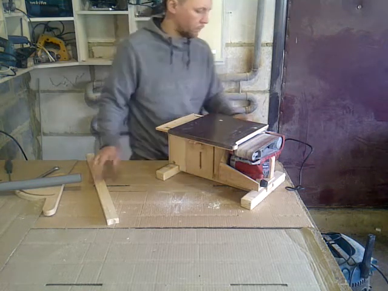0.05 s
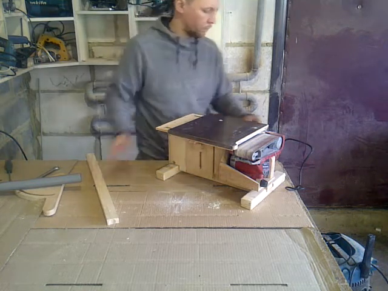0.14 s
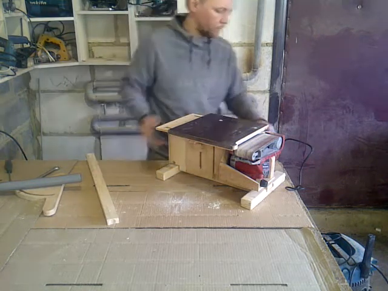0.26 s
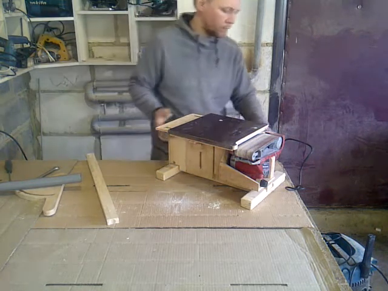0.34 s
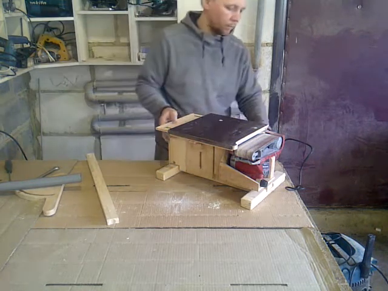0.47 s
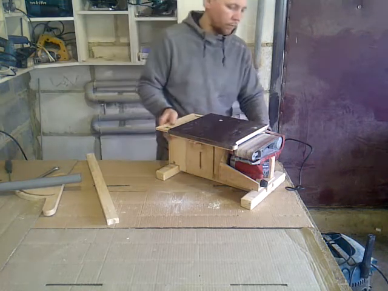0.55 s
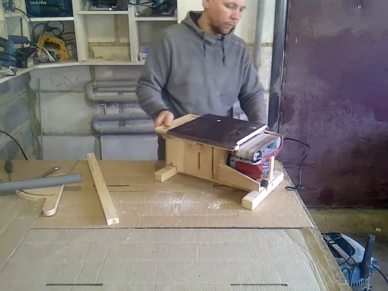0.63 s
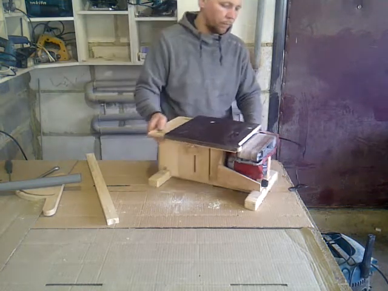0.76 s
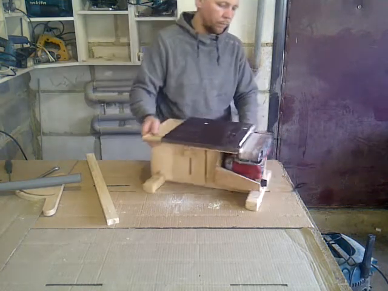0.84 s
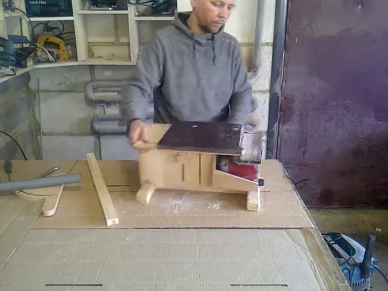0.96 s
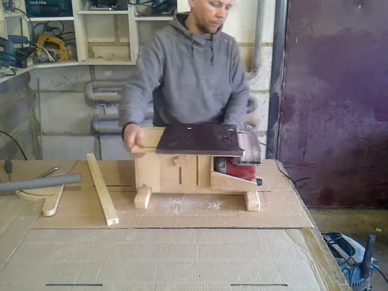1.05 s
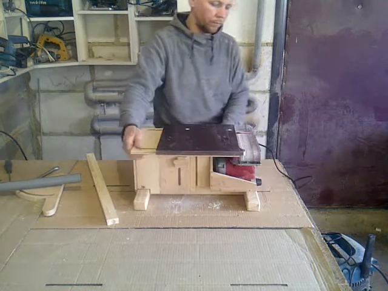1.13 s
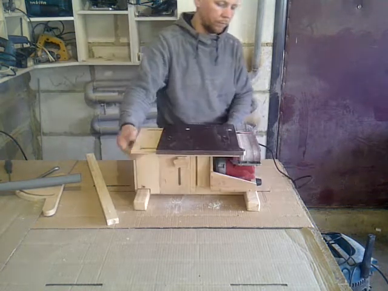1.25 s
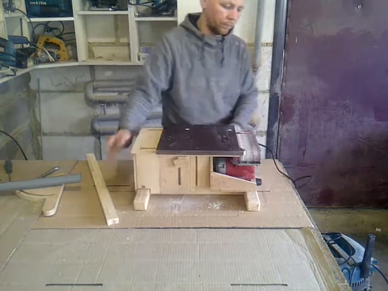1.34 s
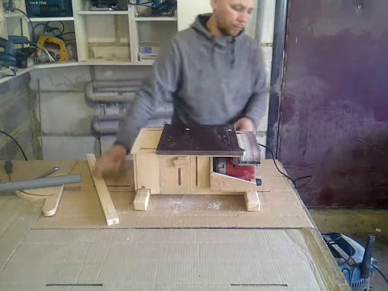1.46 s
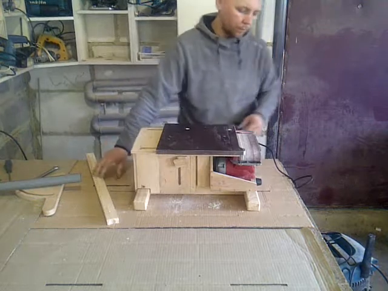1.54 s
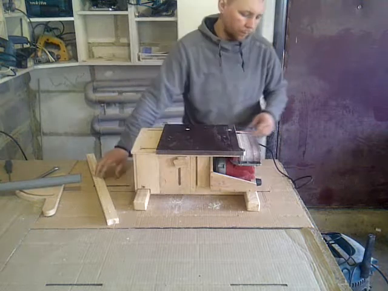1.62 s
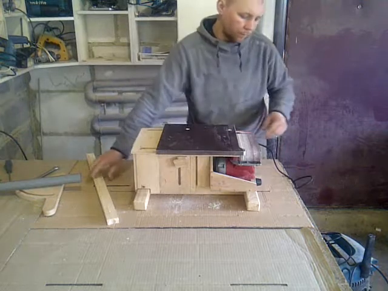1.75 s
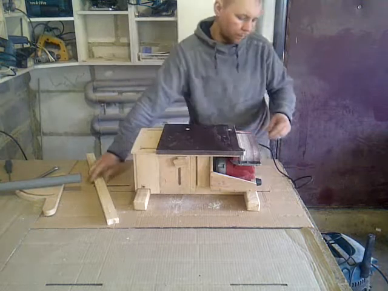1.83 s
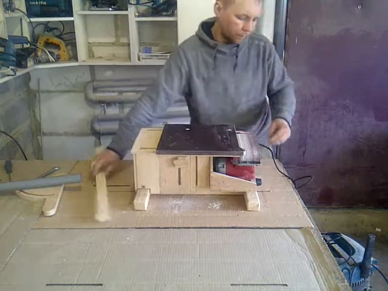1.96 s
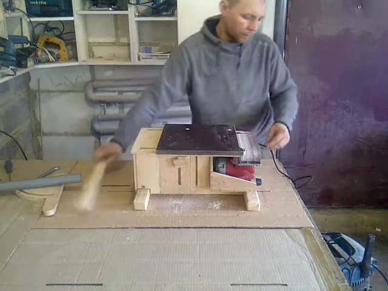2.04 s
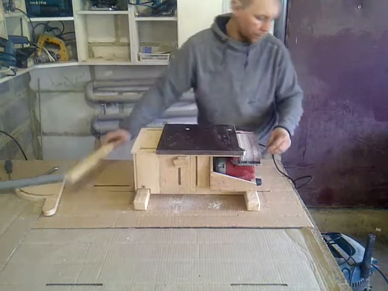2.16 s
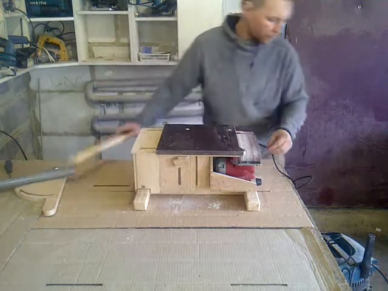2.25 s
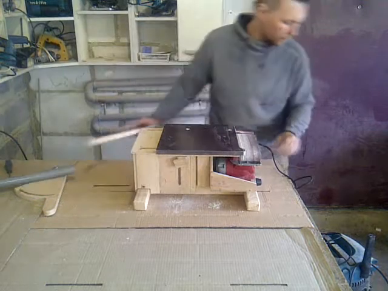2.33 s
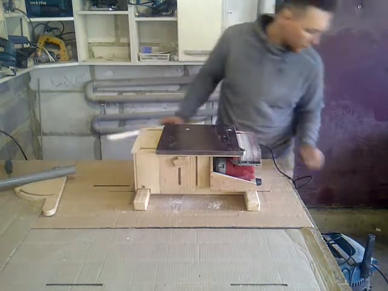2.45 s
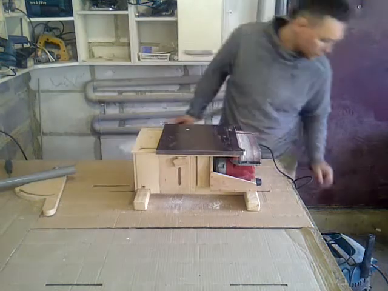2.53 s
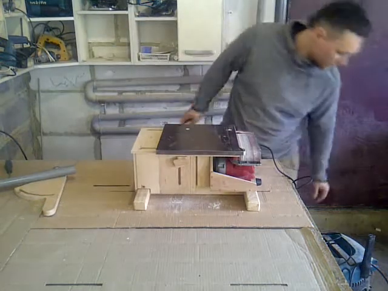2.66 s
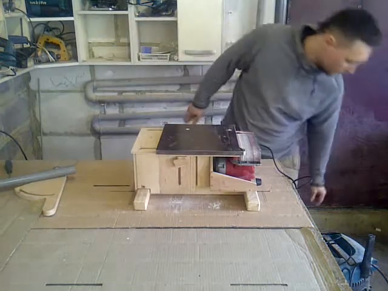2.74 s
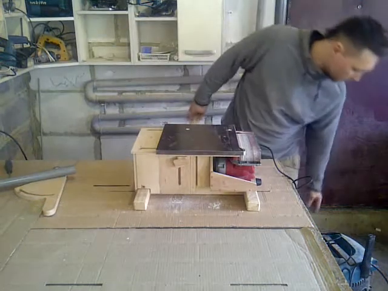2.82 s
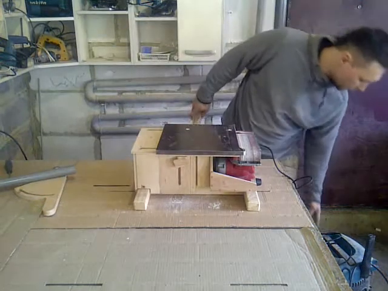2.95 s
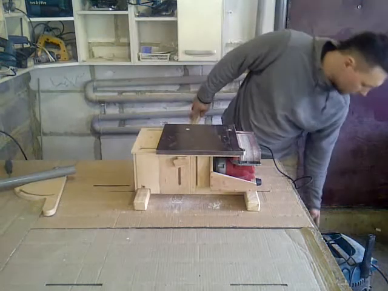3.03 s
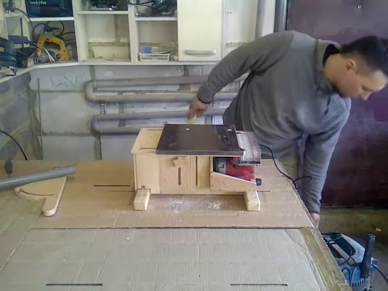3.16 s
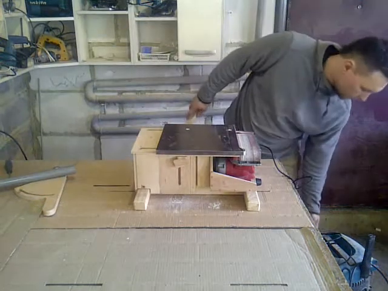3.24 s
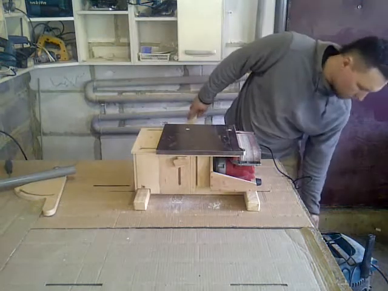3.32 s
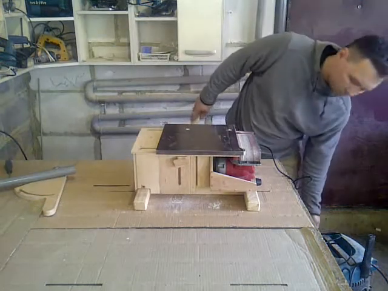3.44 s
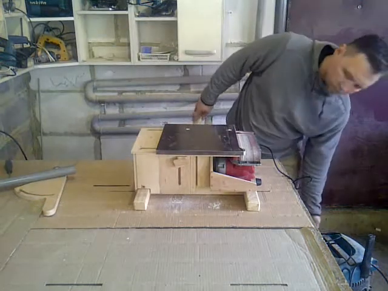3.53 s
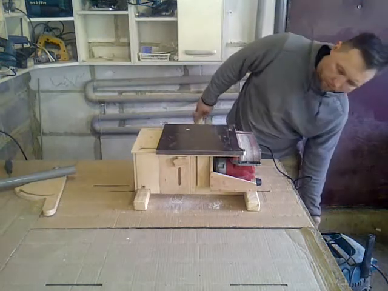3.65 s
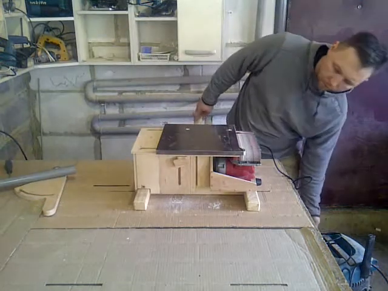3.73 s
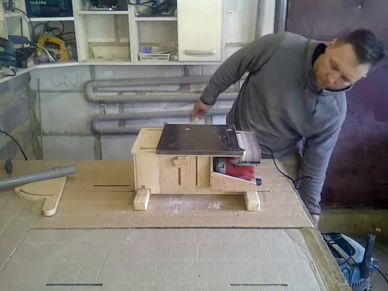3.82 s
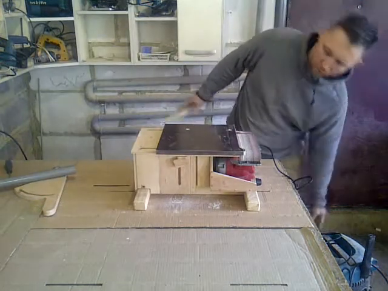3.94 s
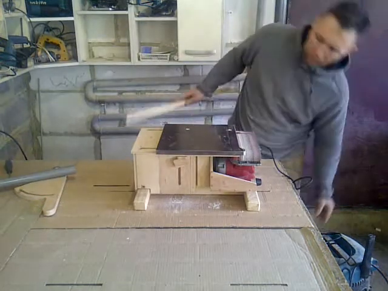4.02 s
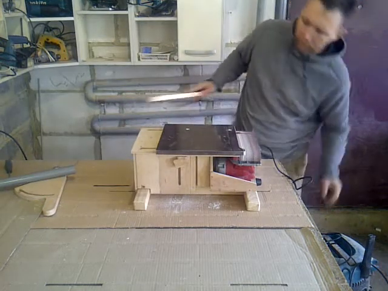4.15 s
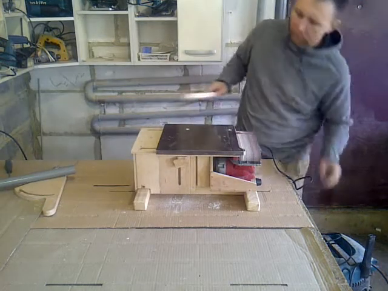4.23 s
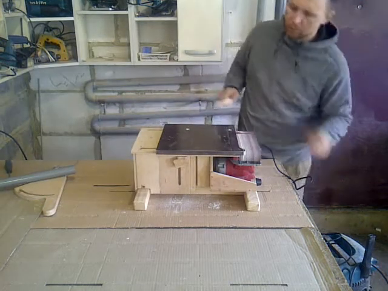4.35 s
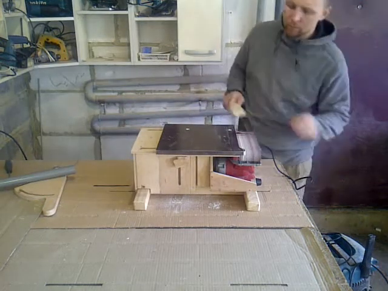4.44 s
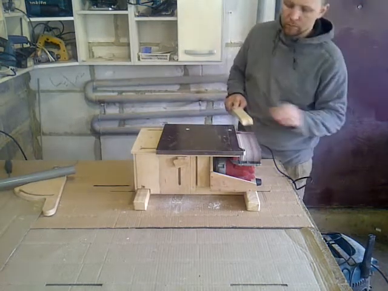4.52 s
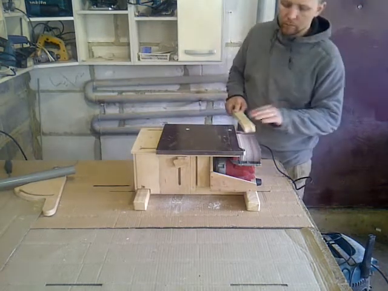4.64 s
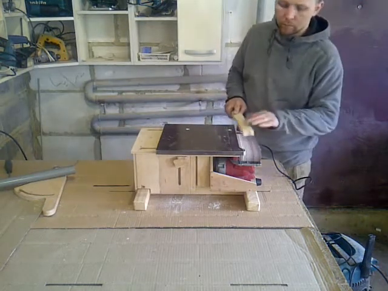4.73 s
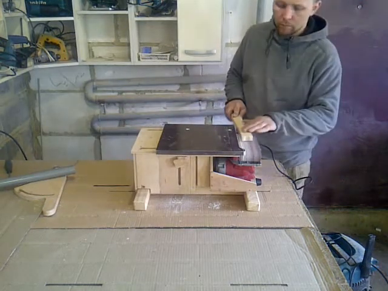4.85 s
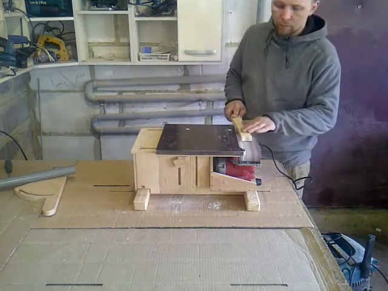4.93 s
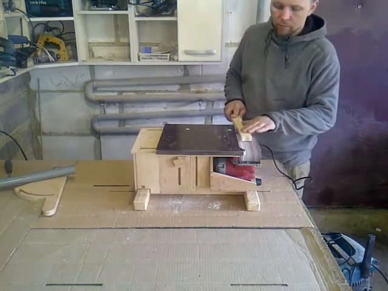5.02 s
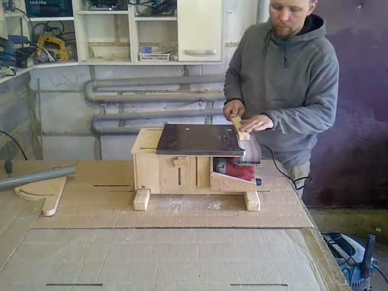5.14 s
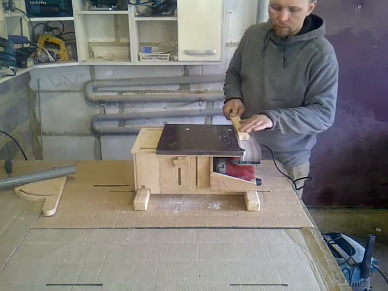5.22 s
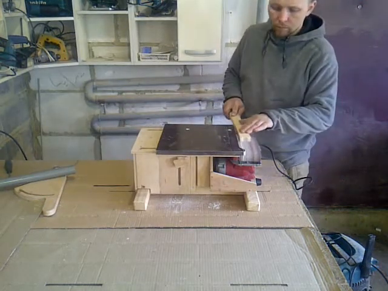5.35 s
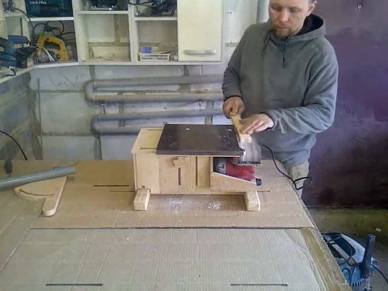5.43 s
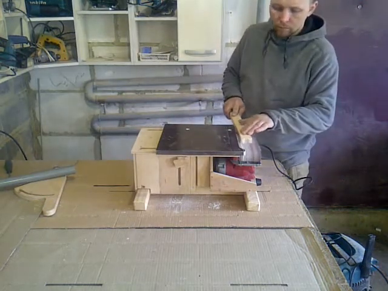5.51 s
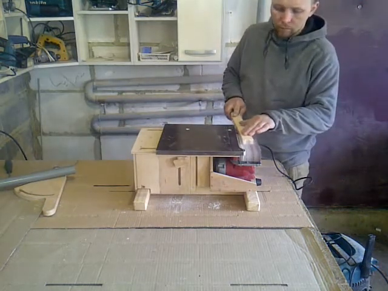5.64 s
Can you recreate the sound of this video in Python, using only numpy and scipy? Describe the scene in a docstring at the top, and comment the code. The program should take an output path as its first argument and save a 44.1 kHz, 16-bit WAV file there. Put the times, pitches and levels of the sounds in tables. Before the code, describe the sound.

In a bare workshop, a hollow wooden box is dragged over a cardboard-covered bench with gritty scraping, sharp bumps and quick ribbed snaps. Soft hand rubs and taps follow, then a stick knocks the box, leaving a faint metallic ring. After a quiet pause a belt sander jolts on, climbs fast to a loud rattling whine, and finally sags in pitch as wood is pressed on it. Slightly dull pickup from across the bench.

```python
"""Home-made sanding station in a workshop

A wooden box is dragged over a cardboard-covered bench: filtered grains scrape, noise bursts bump and snap.
Hands rub and tap, and a stick knocks on the box, ringing wooden and metal modes.
Then a belt sander spins up: rotor-locked sines whine under gear and belt rattle made of dense grains.
Near the end a stick pressed on the belt slows the rotor, lowering and blurring the whine."""
import sys
import numpy as np
from scipy import signal
from scipy.fft import rfft, irfft, next_fast_len
from scipy.io import wavfile

SR = 44100
rng = np.random.default_rng(int(sys.argv[2]) if len(sys.argv) > 2 else 0)


def unload_audio(sound):
    """Save the sound as a 16-bit wav file, at the path given as the first command line argument."""
    columns = np.transpose(np.atleast_2d(sound))
    # keep every value between -1 and 1, then stretch to whole-number steps
    steps = np.round(np.clip(columns, -1, 1) * 32767)
    wavfile.write(sys.argv[1], SR, steps.astype(np.int16))


N = 250488  # length in samples


def from_db(db):
    """Decibels to gain."""
    return 10 ** (np.asarray(db) / 20)


def rms_one(x):
    """Scale to unit rms."""
    return x / np.sqrt(np.mean(x ** 2) + 1e-20)


def seconds():
    """Time of every sample."""
    return np.arange(N) / SR


def decay_per_sample(t60):
    """Factor per sample that loses 60 dB in t60 seconds."""
    return np.exp(-np.log(1000) / (t60 * SR))


def drift(rate_hz):
    """Smooth random wander of rms 1: low-passed noise, drawn at every 40th sample."""
    step = 40
    r = np.exp(-2 * np.pi * rate_hz * step / SR)
    noise = rng.standard_normal(N // step + 2002)
    slow = signal.lfilter([1], [1, -2 * r, r * r], noise)[2000:]  # skip the filter's settling
    return np.interp(np.arange(N) / step, np.arange(len(slow)), rms_one(slow))


def colour(x, spectrum):
    """Shape a steady sound by a spectrum that falls 36 dB per octave further beyond its ends; rms 1."""
    hz, db = np.transpose(spectrum)
    size = next_fast_len(N)
    octave = np.log2(np.arange(size // 2 + 1) * SR / size + 1)
    known = np.log2(hz)
    beyond = np.abs(octave - np.clip(octave, known[0], known[-1]))
    gain = from_db(np.interp(octave, known, db) - 36 * beyond)
    return rms_one(irfft(rfft(x, size) * gain, size)[:N])


def grains(per_s, spread_db):
    """Tiny random impacts of uneven size; rms 1."""
    born = rng.random(N) < per_s / SR
    sign = rng.choice([-1, 1], N)
    size = from_db(spread_db * np.clip(rng.standard_normal(N), -2, 2))
    return rms_one(born * sign * size)


def resonate(x, hz, width_hz):
    """A two-pole resonance with gain 1 on top."""
    r = np.exp(-np.pi * width_hz / SR)
    poles = [1, -2 * r * np.cos(2 * np.pi * hz / SR), r * r]
    return signal.lfilter(np.array([1, 0, -1]) * (1 - r * r) / 2, poles, x + 1e-18)


def ring(impulses, hz, t60):
    """Each unit impulse starts a dying sine of height 1."""
    r, w = decay_per_sample(t60), 2 * np.pi * hz / SR
    return signal.lfilter([0, np.sin(w)], [1, -2 * r * np.cos(w), r * r], impulses + 1e-18)


def band(x, low_hz, high_hz):
    """Causal band-pass with steep skirts."""
    sos = signal.butter(3, [low_hz, high_hz], "band", fs=SR, output="sos")
    return signal.sosfilt(sos, x + 1e-18)


def clicks(events):
    """One impulse for each (seconds, dB) row."""
    s, db = np.transpose(events)
    return np.bincount(np.round(s * SR).astype(int), from_db(db), N)


def cracks(events, low_hz, high_hz, t60):
    """Each contact is a quickly dying burst of noise."""
    envelope = signal.lfilter([1], [1, -decay_per_sample(t60)], clicks(events) + 1e-18)
    burst = band(envelope * rng.standard_normal(N), low_hz, high_hz)
    return burst * np.sqrt(SR / 2 / (high_hz - low_hz))  # make up for the noise lost outside the band


def workshop(x, wet_db, t60=0.38, gap_s=0.0027):
    """Direct sound plus the dense, dying reflections of bare walls."""
    t = seconds()[:SR]
    tail = band(rng.standard_normal(SR), 96, 7300) * np.exp(-np.log(1000) * t / t60) * (t > gap_s)
    tail /= np.sqrt(np.sum(tail ** 2))
    return x + from_db(wet_db) * signal.fftconvolve(x, tail)[:N]


# Colour of the quiet workshop. Each row: frequency in Hz, relative level in dB per Hz.
QUIET_COLOUR = [(25, -38), (45, -22.5), (75, -4), (100, -8), (130, -10), (205, -5), (250, -3), (440, -0.5),
                (570, -4), (820, -5.5), (2500, -8.5), (7300, -10.5), (8850, -34.5)]


def quiet_room():
    """Steady coloured noise under everything."""
    level_db = -65.4
    return from_db(level_db) * colour(rng.standard_normal(N), QUIET_COLOUR)


RUB_ATTACK_S, RUB_RELEASE_DB_PER_S = 0.011, 124


def rub_envelope(start, held, db):
    """A rub sets in quickly, holds and dies away."""
    age = seconds() - start
    attack = np.clip(age / RUB_ATTACK_S, 0, 1)
    return attack * from_db(db - RUB_RELEASE_DB_PER_S * np.maximum(age - held, 0))


# Low rumble of rubbing and dragging. Each row: frequency in Hz, relative level in dB per Hz.
RUMBLE_COLOUR = [(30, -29), (70, -13), (110, -16), (155, 6), (230, 2), (300, -2), (400, 5), (600, -23)]
# Rustle of hands, sleeves and stick. Each row: frequency in Hz, relative level in dB per Hz.
RUSTLE_COLOUR = [(180, -48), (300, -11), (513, -9), (743, -8.5), (1020, -7), (1150, -8), (1380, -1.5),
                 (2390, -3), (2890, -8.5), (6690, -18.5), (8000, -35), (10400, -77), (17600, -120)]
# Rubs of hands, sleeves and the sliding stick. Each row: start in seconds, hold in seconds, level in dB before mix.
HAND_RUBS = [(0.071, 0.0069, -57), (0.325, 0.035, -58.5), (1.387, .03, -63), (1.595, 0.083, -58),
             (1.679, 0.014, -61), (1.794, .08, -50.5), (1.882, 0.032, -53.5), (1.984, .03, -56.5),
             (2.62, 0.13, -60.5), (2.765, 0.088, -60.5), (2.88, .07, -75)]
# Light taps of fingers and stick. Each row: start in seconds, level in dB before mix.
LIGHT_TAPS = [(1.681, -44), (1.803, -47), (1.889, -32), (2.003, -48)]
# Dull thuds of the bench. Each row: start in seconds, level in dB before mix, centre frequency in Hz.
BENCH_THUDS = [(0.359, -60, 150), (0.68, -61, 190), (0.924, -45.5, 140), (1.091, -47, 199),
               (1.281, -55.5, 186), (1.605, -54, 141), (1.892, -52.5, 150), (2.3, -48, 234)]


def handling():
    """Rubbing is soft grain noise; light taps and dull bench thuds are short noise bursts."""
    touch = sum(rub_envelope(*rub) for rub in HAND_RUBS)
    rustle = from_db(-2.0) * colour(grains(2400, spread_db=0.5), RUSTLE_COLOUR)
    rumble = from_db(-18) * colour(grains(1500, spread_db=6), RUMBLE_COLOUR)
    taps = from_db(-7) * cracks(LIGHT_TAPS, 1900, 3200, t60=0.025)
    thuds = sum(cracks([(s, db)], hz / np.sqrt(2), hz * np.sqrt(2), t60=0.25)  # one octave wide
                for s, db, hz in BENCH_THUDS)
    return touch * (rustle + rumble) + from_db(-1.2) * thuds + workshop(taps, wet_db=-8)


# Runs of feet snapping over the cardboard ribs. Each row: start in seconds, end in seconds,
# gap between snaps in seconds, level at the start in dB, level at the end in dB, both before mix.
RIB_RUNS = [(0.9375, 0.968, .0069, -25, -25), (1.1395, 1.15, .0065, -26, -33),
            (1.1575, 1.254, .0176, -33, -34)]


def rib_snaps():
    """Evenly spaced ribs give evenly spaced snaps: (seconds, dB) rows."""
    return [(s, np.interp(s, [start, end], [first_db, last_db]))
            for start, end, gap, first_db, last_db in RIB_RUNS
            for s in np.arange(start, end, gap)]


# How hard the box is dragged. Each row: time in seconds, effort in dB; silent outside the span.
DRAG_EFFORT = [(0.59, -69), (0.63, -44.5), (0.74, -45.5), (0.9, -42.5), (0.97, -36.5), (1.06, -39),
               (1.15, -38.5), (1.265, -60), (1.45, -74)]


def drag_effort():
    """The changing push on the box, as a gain."""
    s, db = np.transpose(DRAG_EFFORT)
    return from_db(np.interp(seconds(), s, db, left=-np.inf, right=-np.inf))


# Main colour of the scrape. Each row: frequency in Hz, relative level in dB per Hz.
SCRAPE_COLOUR = [(1300, -14), (1750, 0.5), (2300, -5), (3000, -8.5), (3600, -10), (4500, -19)]
# Drone of the hollow box. Each row: frequency in Hz, relative level in dB per Hz.
BOX_COLOUR = [(280, -11), (400, -5), (520, -8.5), (750, -6.5), (1050, -2), (1300, -0.5), (1600, -5)]
# Bright grit under the feet. Each row: frequency in Hz, relative level in dB per Hz.
GRIT_COLOUR = [(3000, -2), (4200, 0), (5200, -1), (6300, -4), (7300, 0), (7900, -15), (8800, -32)]
# Feet of the box catching and bumping. Each row: start in seconds, level in dB before mix.
FOOT_BUMPS = [(0.625, -31), (0.6765, -33), (0.681, -27), (1.08, -16), (1.096, -24)]

# a hard push makes the feet rasp in a higher resonance; its level is relative to the effort at its hardest
RASP_HZ, RASP_WIDTH_HZ, RASP_DB = 2250, 600, -4.5
# levels at mean effort, and the share of the effort's dB swing that these three follow
DRONE_DB, GRIT_DB, RUMBLE_DB, FOLLOWS = -52, -57, -57.5, 0.73


def dragged_box():
    """Wooden feet scrape, catch and snap over the cardboard; the bench rumbles underneath."""
    effort = drag_effort()
    grip = from_db(1.26 * drift(37))  # friction sticks and slips unevenly
    rasp = resonate(grains(1800, spread_db=4), RASP_HZ, RASP_WIDTH_HZ)
    rasp = rms_one(resonate(rasp, RASP_HZ, RASP_WIDTH_HZ))
    rasp_gain = from_db(RASP_DB) * effort / effort.max()
    scrape = effort * (from_db(-0.5) * colour(grains(2500, spread_db=1.5), SCRAPE_COLOUR) + rasp_gain * rasp)

    drone = from_db(DRONE_DB) * colour(grains(3000, spread_db=1), BOX_COLOUR)
    grit = from_db(GRIT_DB) * colour(grains(3000, spread_db=-2), GRIT_COLOUR)
    rumble = from_db(RUMBLE_DB) * colour(grains(2200, spread_db=8.5), RUMBLE_COLOUR)
    body = (effort / effort[effort > 0].mean()) ** FOLLOWS * (drone + grit + rumble)

    bumps = from_db(-5.5) * cracks(FOOT_BUMPS, 1560, 3160, t60=0.021)
    panels = from_db(-25.5) * cracks(FOOT_BUMPS, 310, 1500, t60=0.17)  # each bump shakes the hollow box
    ribs = rib_snaps()
    snaps = workshop(cracks(ribs, 4100, 6200, t60=.009), wet_db=-14, t60=.2)
    bench = from_db(-25) * ring(clicks(ribs), 159, 0.21)  # a quick run of snaps sets the bench top booming
    return grip * (scrape + body) + bench + panels + workshop(bumps, wet_db=-19.0) + from_db(-3.5) * snaps


def struck_modes(blows, modes):
    """Modes ringing together from the same blows, with alternating sign."""
    return sum((-1) ** k * from_db(db) * ring(blows, hz, t60) for k, (hz, db, t60) in enumerate(modes))


# Stick against the box. Each row: start in seconds, strength in dB.
STICK_KNOCKS = [(2.2065, -26), (2.218, -49), (2.26, -38.5)]
# Modes of stick and box. Each row: frequency in Hz, level in dB relative to the blow, t60 in seconds.
WOOD_MODES = [(395, -9, 0.056), (446, -2.5, 0.032), (518, 1.5, 0.051), (775, -3, 0.044),
              (1094, -13.5, 0.16), (1480, -12, 0.094), (1850, -0.5, 0.069), (2390, -18, .09),
              (4240, -36, 0.089)]
# The sander's metal frame, its lowest pair beating slowly.
# Each row: frequency in Hz, level in dB relative to the blow, t60 in seconds.
FRAME_MODES = [(1902, -23, 1.1), (1904.3, -23, 1.1), (2042, -26, .6), (2120, -11, .32), (5200, -26, .33)]


def knock():
    """The stick hits the box: short wooden modes, while the sander's metal rings on."""
    first = STICK_KNOCKS[:1]
    wood = struck_modes(clicks(STICK_KNOCKS), WOOD_MODES)
    metal = struck_modes(clicks(first), FRAME_MODES)
    crack = from_db(-19) * cracks(STICK_KNOCKS, 320, 2000, t60=0.054)
    shudder = from_db(-18) * cracks(first, 210, 2100, t60=0.58)  # the loose panels of the box
    buzz = from_db(-19.5) * cracks(first, 800, 4200, t60=0.52)  # the fittings on it
    knocked = workshop(wood + crack, wet_db=-9.5) + metal + shudder + buzz
    return band(knocked, 150, 8000)  # a small box radiates no bass


# The stick pressed on the belt slows the rotor. Each row: time in seconds, rotor speed lost in Hz.
BELT_SAG = [(5.04, 0), (5.14, 11), (5.33, 28), (5.46, 31.5), (5.68, 46)]

# the rotor runs up to its idle speed, steeply at first (shape 1 = plain exponential)
SWITCH_ON_S, IDLE_HZ, RUN_UP_S, RUN_UP_SHAPE = 3.738, 475, .116, .83


def rotor():
    """Rotor speed in Hz, and the load of the stick from 0 to 1."""
    running_s = np.maximum(seconds() - SWITCH_ON_S, 0)
    free_hz = IDLE_HZ * (1 - np.exp(-(running_s / RUN_UP_S) ** RUN_UP_SHAPE))
    lost_hz = np.interp(seconds(), *np.transpose(BELT_SAG))
    return free_hz - lost_hz, lost_hz / lost_hz.max()


# The gears take up their slack at switch-on. Each row: start in seconds, level in dB.
GEAR_JOLTS = [(3.739, -39), (3.77, -14)]


def spin_up(turns):
    """Under the starting torque the gear teeth bite hard: a rough chirp that climbs with the rotor."""
    teeth, peak_s, spread_s = 11.7, 3.8, .038  # teeth: mesh cycles per rotor turn
    torque = np.exp(-((seconds() - peak_s) / spread_s) ** 2 / 2) * (seconds() > SWITCH_ON_S)
    mesh = np.sin(2 * np.pi * teeth * turns + .9 * drift(130)) * from_db(2.5 * drift(90))
    chirp = from_db(-19.5) * band(torque * mesh, 1200, 4200)
    return chirp + cracks(GEAR_JOLTS, 1340, 1830, t60=.04)


LOOSE_SPEED = 0.81  # share of the idle speed from which all parts rattle freely
# rattle: level at idle, extra at full torque, power of the speed it follows while starting
RATTLE_DB, TORQUE_DB, RATTLE_POWER = -17, 4, 1
# grit hiss: level at idle, change under full load, power of the speed it follows while starting
HISS_DB, HISS_LOAD_DB, HISS_POWER = -23.5, -2.4, 1.6
BITE_S, BITE_WIDTH_S, BITE_DB = 5.1, 0.045, 1.5  # the stick first bites: when, spread in time, extra rattle
SURGE_DB, SURGE_HZ = 0.38, 10  # the rattle swells and eases as the belt wanders


def running_gains(speed, pressed):
    """Rattle and hiss swell with rotor speed; torque and the stick's bite add rattle, its load damps the hiss."""
    loose = np.minimum(speed / LOOSE_SPEED, 1)
    bite = np.exp(-((seconds() - BITE_S) / BITE_WIDTH_S) ** 2 / 2)
    torque = (1 - speed) * (pressed == 0)
    rattle_db = RATTLE_DB + TORQUE_DB * torque + BITE_DB * bite + SURGE_DB * drift(SURGE_HZ)
    hiss_db = HISS_DB + HISS_LOAD_DB * pressed
    return loose ** RATTLE_POWER * from_db(rattle_db), loose ** HISS_POWER * from_db(hiss_db)


# Colour of the rattle. Each row: frequency in Hz, relative level in dB per Hz.
RATTLE_COLOUR = [(25, -33.5), (50, -41.5), (110, -31), (200, -22), (290, -19.5), (400, -10.5), (800, -10.5),
                 (1280, -10.5), (1520, -1), (1750, -0.5), (2050, -3), (2380, -2), (2750, -11), (3300, -25)]
# Colour of the grit hiss. Each row: frequency in Hz, relative level in dB per Hz.
HISS_COLOUR = [(2400, -18), (3000, -3), (3450, 0.5), (4000, -5), (4800, -9), (5600, -13.5), (6600, -15.5),
               (7100, -12), (7600, -22), (8000, -28.5), (8500, -41.5), (8900, -54.5)]
# Housing resonances. Each row: frequency in Hz, width in Hz, relative gain in dB.
HOUSING_MODES = [(971, 9.7, -9.5), (1074, 31, -7), (1400, 44, -5.5), (1509, 12, 2.5), (1638, 17, -1.5),
                 (1769, 9.2, 3), (1650, 27, -34), (2190, 32, -5), (2400, 6.7, 4), (3270, 6.7, -14),
                 (3220, 18, -7), (3443, 20, -3.5), (3740, 74, -11.5), (5260, 20, -15)]


def gears_and_belt(turns, speed, pressed, throb=0.045, lurch_db=0.3):
    """Dense tooth and grit impacts, bunched by the turning shafts, ring the housing."""
    rattle_gain, hiss_gain = running_gains(speed, pressed)
    shaft = np.sin(2 * np.pi * 0.068 * turns + drift(9))  # a slow shaft, 0.068 turns per rotor turn
    load = from_db(lurch_db * drift(32)) * (1 + throb * shaft)
    teeth = grains(7000, spread_db=4.0) * load
    housing = rms_one(sum(from_db(db) * resonate(grains(3000, spread_db=1.0) * load, hz, width_hz)
                          for hz, width_hz, db in HOUSING_MODES))
    rattle = from_db(-0.34) * colour(teeth, RATTLE_COLOUR) + from_db(-7.5) * housing
    hiss = colour(grains(12000, spread_db=2) * load, HISS_COLOUR)
    return rattle_gain * rattle + hiss_gain * hiss


# How strongly the rotor's unbalance shakes the box. Each row: rotor speed in Hz, level in dB before trim.
UNBALANCE_HUM = [(295, -61), (320, -20.5), (335, -17.5), (358, -18.5), (382, -23.5), (407, -18.5),
                 (425, -23.5), (440, -24), (451, -28.5), (466, -29.5), (475, -29.5)]
# Tones locked to the rotor. Each row: multiple of the rotor speed, level at unloaded idle in dB rms before
# flutter, flutter in dB, power of the speed that the level follows.
ROTOR_TONES = [(.415, -43.5, 3, 7), (.5, -44.5, 2, 5), (.83, -47, 3, 3), (2, -44, 3, 2), (4, -39, 4, 2),
               (9, -46, 2, 1), (10, -36, 1.8, .5), (10.5, -48, 2.5, 2), (11, -45.5, 2.5, 2)]


def motor(turns, speed, pressed, damping_db=-0.5):
    """The unbalanced rotor hums; belt, fan and gear tones grow with speed, damped and blurred by load."""
    angle = 2 * np.pi * turns
    shaking = from_db(np.interp(speed * IDLE_HZ, *np.transpose(UNBALANCE_HUM), left=-np.inf))
    hum = from_db(-0.5 + drift(36)) * shaking * np.sin(angle + .06 * drift(13))
    blur = 0.23 + .9 * pressed  # phase wander in radians
    tones = 0
    for multiple, db, flutter_db, power in ROTOR_TONES:
        level = from_db(db + flutter_db * drift(6.4)) * speed ** power
        start_phase = 2 * np.pi * rng.random()
        tones = tones + level * np.sin(multiple * angle + start_phase + blur * drift(10))
    return np.sqrt(2) * (hum + tones * from_db(damping_db * pressed))  # sqrt(2): rms to peak of a sine


def sander():
    """Everything in the machine follows the rotor."""
    rotor_hz, pressed = rotor()
    turns, speed = np.cumsum(rotor_hz) / SR, rotor_hz / IDLE_HZ
    return motor(turns, speed, pressed) + gears_and_belt(turns, speed, pressed) + spin_up(turns)


def scene():
    """All sources over the quiet of the room."""
    return (quiet_room() + handling() + dragged_box() + knock() + sander())[None]


def record(dry):
    """A steep low-pass cuts the top."""
    cutoff_hz = 8850
    return signal.sosfilt(signal.ellip(12, .1, 90, cutoff_hz, fs=SR, output="sos"), dry)


dry = scene()
out = record(dry)
unload_audio(out)
```